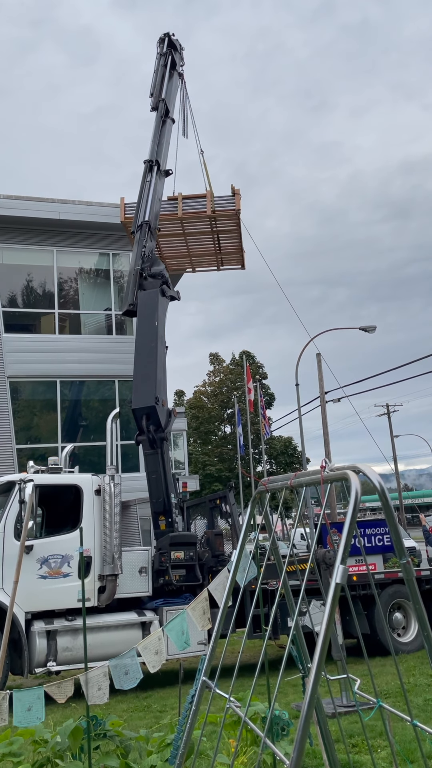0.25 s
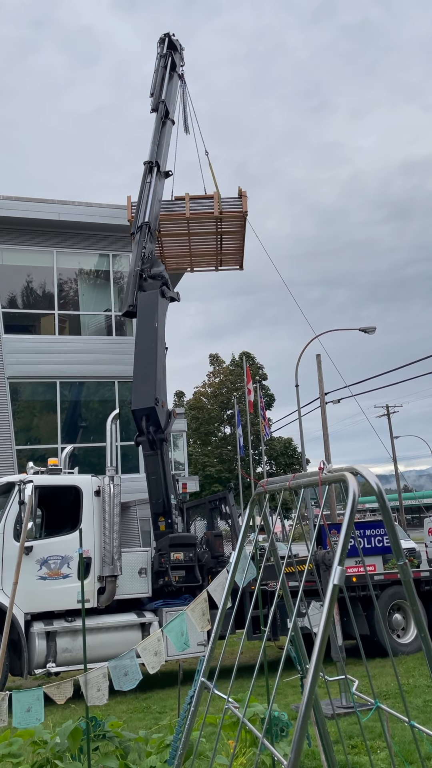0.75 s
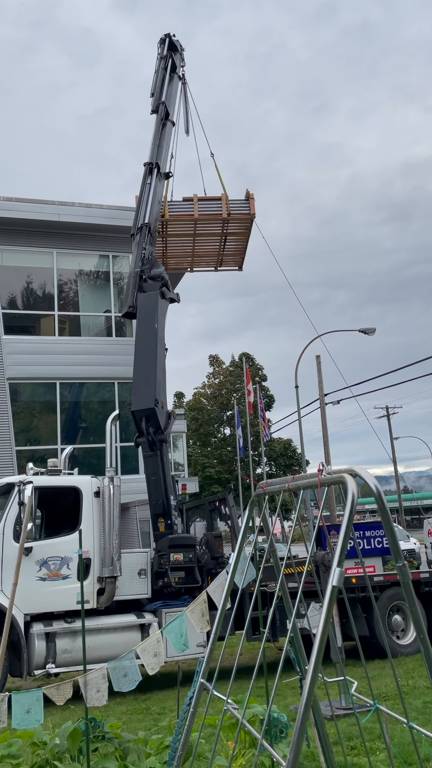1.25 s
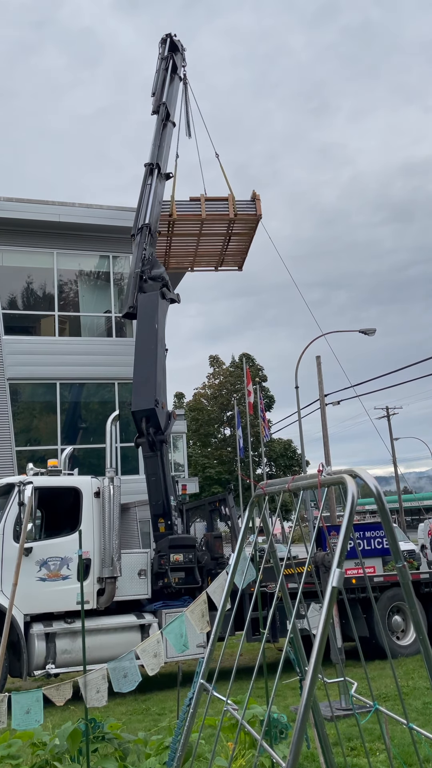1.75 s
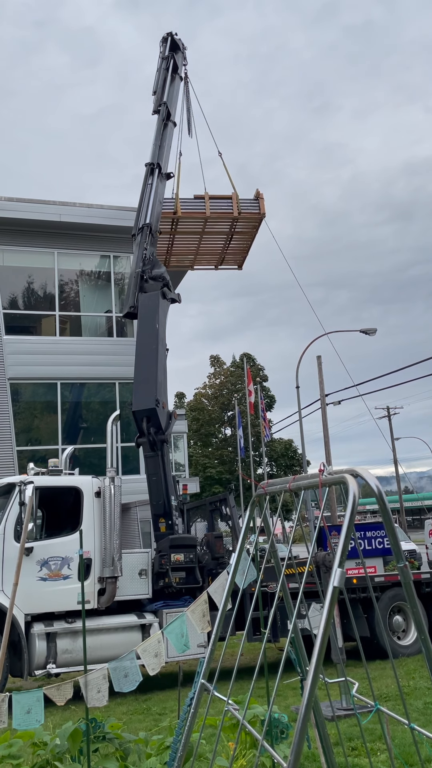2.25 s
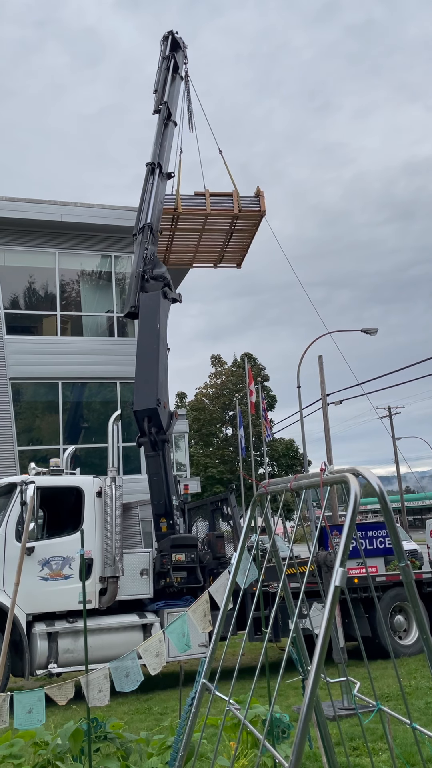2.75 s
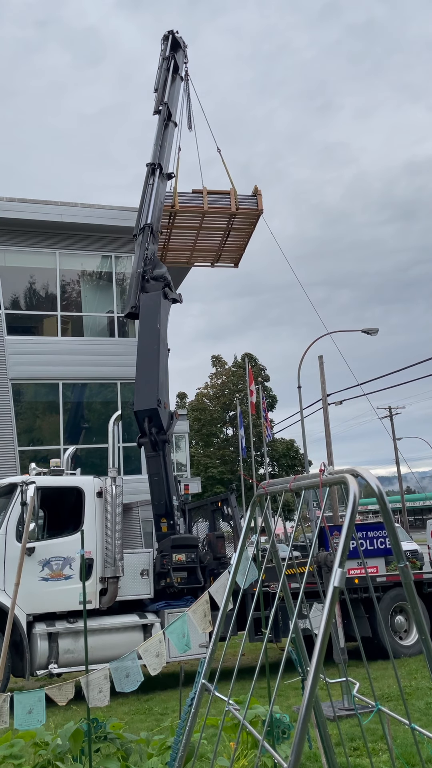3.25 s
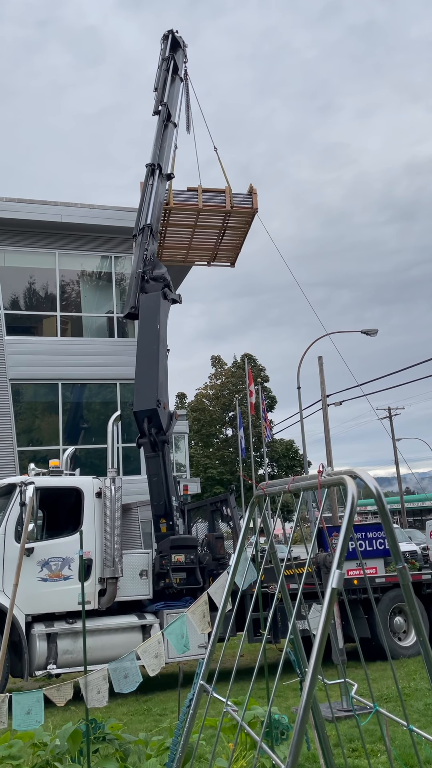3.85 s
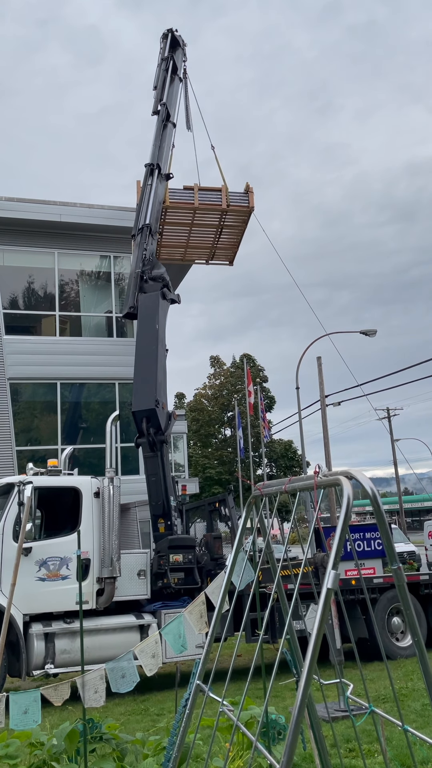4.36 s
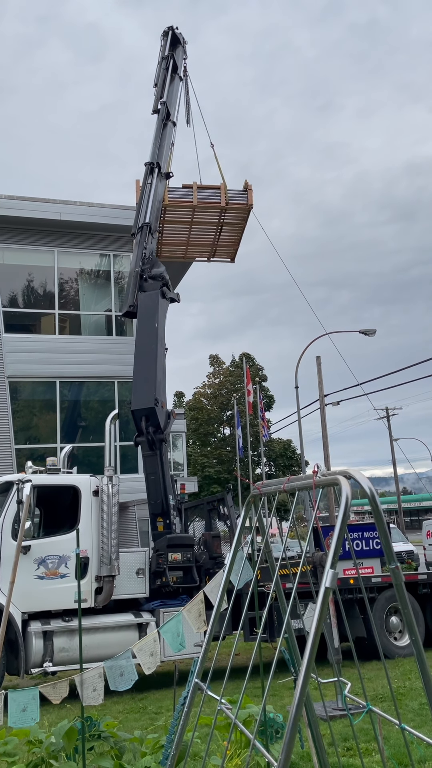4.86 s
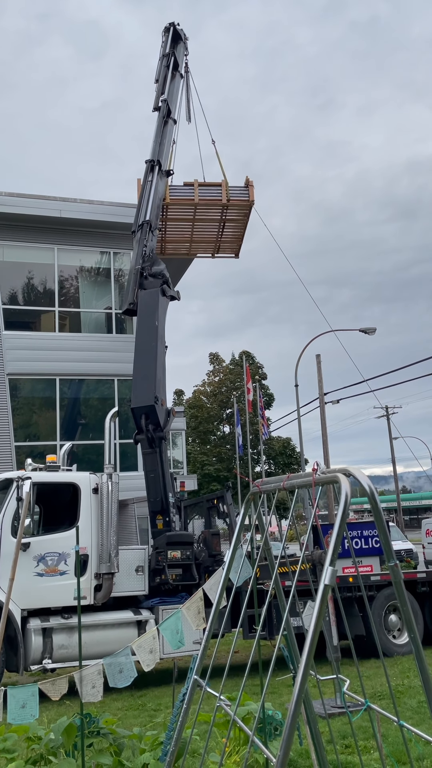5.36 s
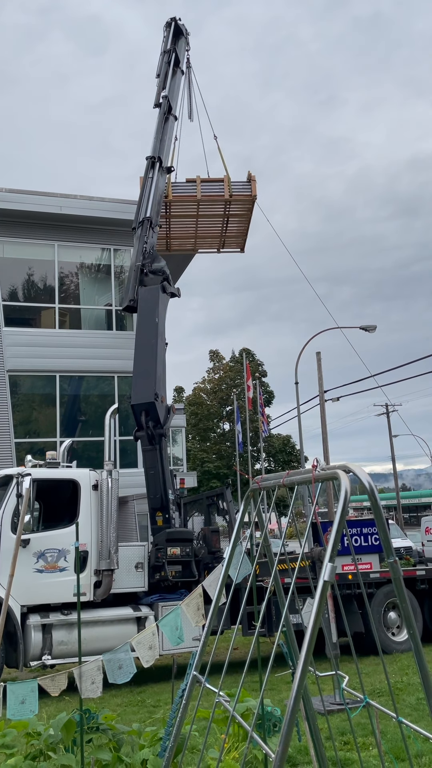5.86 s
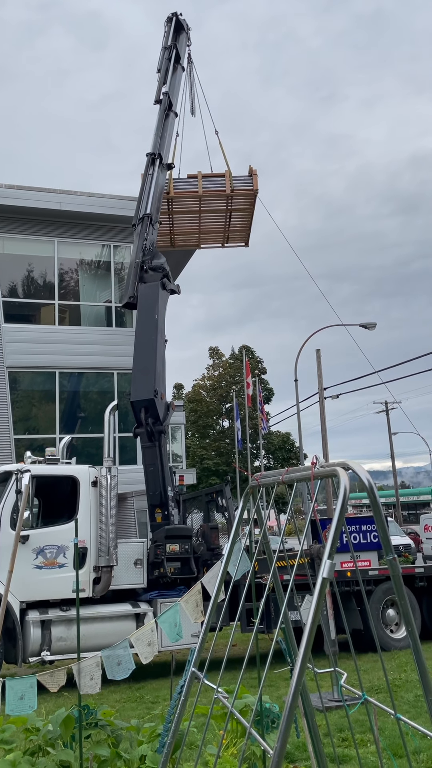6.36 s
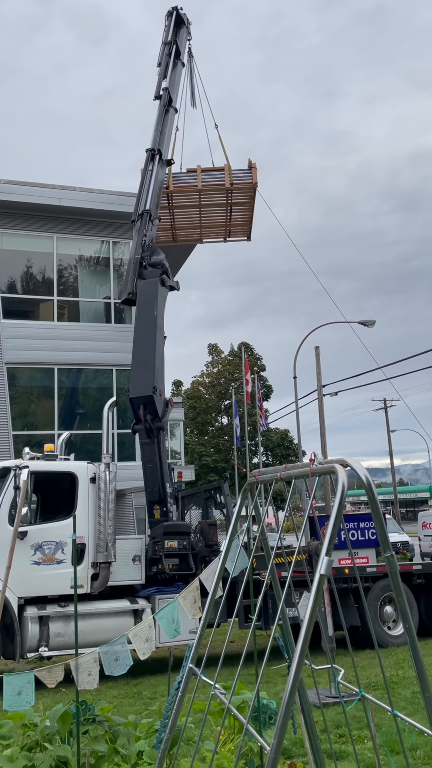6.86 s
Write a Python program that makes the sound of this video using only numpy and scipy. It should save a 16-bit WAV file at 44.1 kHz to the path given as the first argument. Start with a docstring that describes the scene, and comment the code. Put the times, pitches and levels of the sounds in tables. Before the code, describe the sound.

Outdoors, a truck-mounted crane runs with constant diesel rattle, steady gear and pump whine and oil hiss, as a passing vehicle draws near.

```python
"""A six-cylinder diesel at fast idle drones and clatters: a truck crane lifts a crate outdoors.
Engine, take-off gear and seven-piston pump are sums of sines locked to one shaft.
Clatter and valve hiss are coloured noise, a share of it repeating every engine cycle.
On the road behind, traffic draws near: noise swells by distance, and the exhaust note of one
vehicle beats against the diesel's firing note."""
import sys
import numpy as np
from scipy import signal
from scipy.fft import rfft, irfft
from scipy.io import wavfile

SR = 44100
rng = np.random.default_rng(int(sys.argv[2]) if len(sys.argv) > 2 else 0)


def dump(signal):
    """Clip the signal to [-1, 1] and save it as 16-bit WAV at the path in sys.argv[1]."""
    limited = np.clip(np.atleast_2d(signal).T, -1, 1)
    pcm = np.round(limited * 32767).astype(np.int16)
    wavfile.write(sys.argv[1], SR, pcm)


N = 313110
TIME = np.arange(N) / SR
FREQS = np.maximum(np.fft.rfftfreq(N, 1 / SR), 1)
WHINE_ORDER = 21  # pump whine per shaft turn: three times the piston rate
SHAFT_PER_CYCLE = 29.6484 / 10.4086  # shaft turns per four-stroke cycle


def from_db(db):
    """Decibels to gain."""
    return 10 ** (np.asarray(db) / 20)


def rms_one(x):
    """Scale to unit power."""
    return x / np.sqrt(np.mean(x ** 2) + 1e-20)


def in_time(rows):
    """Each column of a curve at every sample."""
    s, *columns = np.transpose(rows)
    return [np.interp(TIME, s, column) for column in columns]


def at_hz(rows, hz):
    """Each column of a table at the given frequencies, on a log axis."""
    f, *columns = np.transpose(rows)
    return [np.interp(np.log(hz), np.log(f), column) for column in columns]


def drift(rate_hz):
    """Slow chance with spread 1, changing about rate_hz times a second; drawn every 100 samples."""
    r = np.exp(-200 * np.pi * rate_hz / SR)
    white = rng.standard_normal(N // 100 + 1002)
    slow = signal.lfilter([1], [1, -2 * r, r * r], white)[1000:]  # settled part
    return np.interp(np.arange(N) / 100, np.arange(len(slow)), rms_one(slow))


def tone(turns, db):
    """A sine of the given rms level."""
    return np.sqrt(2) * from_db(db) * np.sin(2 * np.pi * turns)


def ports(hz):
    """Level difference/dB, coherence and left lead/rad; long waves reach both ports alike."""
    # two microphone ports: f/Hz, left-right/dB, coherence/0-1, left lead/rad
    port_rows = [(296, 4, 1, 0.46), (427, 2.5, 0.9, 1.02), (537, 8, 0.87, .5), (870, 3, 0.16, -0.07),
                 (1250, 3, 0.84, 0.5), (1690, -0.5, 0.82, 0.75), (1980, -2.5, 1, 0.5),
                 (2430, -10, 0.35, -1.5), (2570, -6.5, 0.6, -2.5), (3070, -1.5, 0.79, -2.5),
                 (3460, -7, 0.6, -4), (4350, -6, 0.32, -6), (5000, 2.5, 1, -6), (6030, 0, 1, -4.5),
                 (7760, 2, 1, -3), (10700, -1, 1, -0.5), (12600, 0, 1, 2)]
    mono_below_hz = 265
    pan_db, alike, lead = at_hz(port_rows, hz)
    apart = 1 / (1 + (mono_below_hz / hz) ** 4)
    coherence = 1 - (1 - np.clip(alike, 0, 1)) * apart ** 2
    return pan_db * apart, coherence, lead * apart


def noise(colour, cycle=None, repeat=0):
    """Unit-power stereo noise of given gain per frequency; a power share of its top may repeat per cycle."""
    white = rfft(rng.standard_normal((2, N)))
    if cycle is not None:
        repeat_above_hz = 750  # only the bright part, from metal contacts, repeats
        size = int(N / (cycle[-1] - cycle[0]))
        share = repeat / (1 + (repeat_above_hz / FREQS) ** 6)
        random_phase = np.exp(2j * np.pi * rng.random((2, size // 2 + 1)))
        one_cycle = rms_one(irfft(random_phase, size))
        contacts = one_cycle[:, (cycle * size).astype(int) % size]
        white = np.sqrt(1 - share) * white + np.sqrt(share) * rfft(contacts)
    pan_db, alike, lead = ports(FREQS)
    mid, side = white * np.sqrt([1 + alike, 1 - alike])
    left = (mid + side) * from_db(pan_db / 2)
    right = (mid - side) * from_db(-pan_db / 2) * np.exp(-1j * lead)
    return rms_one(irfft(np.array([left, right]) * colour, N))


def coloured(spectrum, cycle=None, repeat=0):
    """Stereo noise that follows a spectrum."""
    return noise(from_db(at_hz(spectrum, FREQS)[0]), cycle, repeat)


def whine(orders, shaft, swell_db, flutter_db, flutter_hz, jitter_turns):
    """Partials locked to a rotation; the higher ones flutter more in level and phase."""
    out = np.zeros((2, N))
    shaft_hz = shaft[-1] / TIME[-1]
    for order, (db, pan_db) in orders.items():
        lead = ports(order * shaft_hz)[2]
        loose = np.sqrt(order / WHINE_ORDER)
        turns = order * shaft + rng.random() + jitter_turns * loose * drift(6.8)
        phase = 2 * np.pi * (turns % 1)
        height = np.sqrt(2) * from_db(db + swell_db + flutter_db * loose * drift(flutter_hz))
        out[0] += from_db(pan_db / 2) * height * np.sin(phase)
        out[1] += from_db(-pan_db / 2) * height * np.sin(phase - lead)
    return out


def diesel(cycle, uneven_db, stroke_db):
    """Six firings a cycle, none quite alike; every third order lines up into a chug, the rest lie loose."""
    # exhaust partials: multiple of the cycle rate: mean level/dB
    engine_orders = {5: -50, 6: -30, 7: -50, 8: -50, 9: -35.6, 10: -44.5, 12: -29.9, 13: -52, 14: -42.4, 15:
                     -33, 16: -50, 17: -43.6, 18: -34.2, 22: -39.2, 23: -50, 24: -55.5, 26: -47.5, 27: -47,
                     28: -54, 30: -50, 31: -55, 34: -53, 35: -51, 36: -53, 38: -53}
    # the octave of the firing note throbs slowly
    throb_order, throb_db, throb_hz, throb_peak_s = 12, 1.1, 1.87, 0.27
    pipe_smear_turns = .08  # the pipe delays partials unequally: firings spread into the next
    chug_lag_cycles = .033  # the unequal cylinder groups chug a little after the firings
    effort_db = uneven_db * drift(2.3) + stroke_db * drift(22)
    throb = throb_db * np.cos(2 * np.pi * throb_hz * (TIME - throb_peak_s))
    out = 0
    for order, db in engine_orders.items():
        if order % 6 == 0:
            offset = 1 / 8  # firing harmonics in step
        elif order % 6 == 3:
            offset = chug_lag_cycles * (15 - order)
        else:
            offset = rng.random()
        wobble = .006 * drift(4)
        smear = pipe_smear_turns * (order / 6 - 2) ** 2
        level_db = db + effort_db + throb * (order == throb_order)
        out = out + tone(order * cycle + offset + wobble - smear, level_db)
    return out


def clatter(cycle, shaft, level_db, depth, knock_db):
    """Valves and injectors rattle partly alike each cycle over fan noise; firings knock unequally."""
    # f/Hz, relative density/dB
    clatter_colour = [(20, -41), (33, -39), (48, -4), (80, -5.5), (120, -2.5), (170, -6.5), (230, -5.5),
                      (310, -7.5), (370, -6), (470, -9.5), (680, -6.5), (1000, -10), (1450, -13),
                      (1750, -13), (2300, -17), (2600, -26.5), (3000, -38), (13000, -68)]
    piston_shake = .02  # depth at which the pump's piston strokes shake the clatter
    firings = 6 * cycle
    strength = from_db(knock_db * rng.standard_normal(int(firings[-1]) + 2))
    knock = np.interp(firings, np.arange(len(strength)), strength)
    shake = piston_shake * np.cos(2 * np.pi * 7 * shaft)
    alternate = depth * np.cos(np.pi * firings)  # strong and weak in turn
    rattle = from_db(level_db) * coloured(clatter_colour, cycle, repeat=.28)
    return rattle * knock * (1 + alternate + shake)


def buzz(cycle, level_db):
    """The engine's block and covers buzz on its higher orders."""
    # multiple of the cycle rate: level/dB before level_db
    buzz_orders = {42: -55, 46: -53, 48: -54, 51: -53, 53: -52, 54: -53, 56: -53, 58: -49, 60: -51, 64: -55,
                   65: -55, 69: -52, 71: -52, 72: -51, 75: -54, 84: -53, 88: -54, 89: -55, 90: -52, 93: -52,
                   94: -54, 99: -56, 102: -56, 109: -56, 112: -57, 114: -56, 119: -57, 126: -53, 133: -57,
                   135: -56, 145: -54, 173: -57, 216: -61}
    cycle_hz = (cycle[-1] - cycle[0]) / TIME[-1]
    orders = {order: (db, ports(order * cycle_hz)[0]) for order, db in buzz_orders.items()}
    return whine(orders, cycle, level_db, flutter_db=0.74, flutter_hz=2.4, jitter_turns=0.013)


def hum(cycle):
    """An engine partial and a slightly slower tone, probably the slipping fan, throb together."""
    # t/s, beat rate/Hz
    fan_slip = [(0, 2.05), (1.4, 2.7), (3.9, 2.4), (4.3, 1.2), (7.1, 1.65)]
    order, engine_db, fan_db = 32, -42, -41.3
    slip = np.cumsum(in_time(fan_slip)[0]) / SR
    return tone(order * cycle, engine_db) - tone(order * cycle - slip, fan_db)


def piston_pump(shaft):
    """Seven piston strokes a shaft turn whine, with harmonics and sidebands."""
    # multiple of the shaft rate: (level/dB, left-right/dB)
    piston_orders = {7: (-45.5, 0), 14: (-43.5, -1.1), 19: (-46, 11), 21: (-29.6, 6.7), 23: (-53, 6),
                     28: (-46, 2), 33: (-54, 9.5), 35: (-55, 6), 40: (-49.5, 10), 42: (-44.6, 8.9),
                     46: (-50.5, 3), 47: (-48, 2), 49: (-53.5, 3), 50: (-51, 2), 56: (-57.5, 0),
                     60: (-54, 0), 66: (-52.5, -3), 70: (-58, -5), 73: (-56, -5), 80: (-56, -7),
                     98: (-49, -5), 105: (-53, -5.5)}
    return whine(piston_orders, shaft, 0, flutter_db=0.0, flutter_hz=2.7, jitter_turns=0.0066)


def gear_load():
    """Load shifts ease in and out; gives dB changes of mesh tone, octave and octave sideband."""
    # middle t/s, half length/s, change/dB of mesh tone, of its octave, of the octave's sideband
    load_shifts = [(0.25, 0.49, 1.5, -6, 3), (1.3, 0.97, 1.5, 5, 5), (2.95, 0.3, -2.5, -6, -3),
                   (3.55, 0.15, 2, 0, -2), (4.3, 0.1, -5, -2.5, 0), (4.39, 0.18, 0, 11, 0),
                   (4.5, 1, 1, 2, -1)]
    changes = 0
    for middle_s, length_s, *changes_db in load_shifts:
        changes = changes + np.outer(changes_db, np.exp(-((TIME - middle_s) / length_s) ** 2))
    return changes


def take_off_gear(shaft):
    """The 26 teeth mesh once each per shaft turn; mesh tone and octave vary with the load."""
    # all five: multiple of the shaft rate: (level/dB before load and flutter, left-right/dB)
    mesh_orders = {25: (-45, 4.7), 26: (-35.3, 4.4), 27: (-45, 4.4)}
    octave_order = {52: (-48, 0)}
    upper_sideband = {53: (-53.5, 4)}
    outer_sidebands = {51: (-45, 0), 54: (-61, -2)}  # further lines around the octave
    top_orders = {78: (-52.5, -2), 91: (-56.5, -8.5), 104: (-53.5, -7), 130: (-54.8, -2.2), 131: (-61, -9),
                  156: (-60, -7), 182: (-62.5, 1)}
    mesh_db, octave_db, sideband_db = gear_load()
    mesh = whine(mesh_orders, shaft, mesh_db, flutter_db=.9, flutter_hz=4.9, jitter_turns=.035)
    octave = whine(octave_order, shaft, octave_db, flutter_db=1.8, flutter_hz=3.5, jitter_turns=0.016)
    sideband = whine(upper_sideband, shaft, sideband_db, flutter_db=2.5, flutter_hz=4.4, jitter_turns=0.06)
    outer = whine(outer_sidebands, shaft, 0, flutter_db=0.4, flutter_hz=5.9, jitter_turns=0.083)
    sheen = whine(top_orders, shaft, 0, flutter_db=1.0, flutter_hz=3.5, jitter_turns=0.06)
    return mesh + octave + sideband + outer + sheen


def oil(shaft, cycle, hiss_db, ripple, surge_db):
    """Oil surges through the valves and rings their block; flow ripples 2 and 6 times a shaft turn."""
    # f/Hz, relative density/dB
    hiss_colour = [(1200, -34), (2400, -2), (3100, 3), (4200, -4), (5600, -3.5), (6300, -5.5), (6800, -3.5),
                   (7300, -27.5), (9300, -10), (10800, -15.5), (12000, -22.5), (12900, -12)]
    # narrow rings of the valve block: f/Hz, width/Hz, level/dB
    valve_rings = [(1397, 140, -43), (3063, 81, -51), (3940, 64, -63.5), (4617, 66, -57), (5466, 95, -57),
                   (10930, 120, -65.5)]
    # the hiss ticks once per engine cycle
    tick_depth, tick_turns, tick_sharpness = .11, .1, 5
    ring_density, ring_power = 0, 0
    for hz, width_hz, db in valve_rings:
        power = from_db(db) ** 2
        ring_density = ring_density + power / width_hz / (1 + (2 * (FREQS - hz) / width_hz) ** 2) ** 2
        ring_power += power
    hiss = from_db(hiss_db + surge_db * drift(22)) * coloured(hiss_colour, cycle, repeat=.09)
    ringing = np.sqrt(ring_power) * noise(np.sqrt(ring_density))
    pulse = np.sin(2 * np.pi * 2 * shaft) + .6 * np.sin(2 * np.pi * 6 * shaft)
    tick = tick_depth * np.exp(tick_sharpness * (np.cos(2 * np.pi * (cycle - tick_turns)) - 1))
    return (hiss + ringing) * (1 + ripple * pulse + tick)


def passing(nearest_s, near_db, span_s, loss_db):
    """Gain of a source that moves past on a straight road."""
    distance = np.hypot(1, (TIME - nearest_s) / span_s)
    return from_db(near_db - loss_db * np.log10(distance))


def approaching_exhaust():
    """Three partials of a vehicle that speeds up, changes gear near 5 s and pulls, turning throaty."""
    # t/s, exhaust note f/Hz
    exhaust_pitch = [(0, 66.42), (1.2, 64.75), (2.2, 65.74), (3.3, 66.52), (4.4, 67.4), (5.0, 63.89),
                     (5.6, 67.86), (6.3, 68.38), (7.1, 68.97)]
    # dropping off the throttle: t/s, note level/dB, level/dB of the throaty partial a fourth above
    exhaust_level = [(0, -51, -48), (2.2, -39, -46), (3.3, -33, -42), (4.4, -42, -43), (5.0, -34, -44),
                     (5.6, -43, -44), (6.25, -37, -30.5), (6.6, -30, -36), (7.1, -21.5, -31)]
    sub_db = -13  # lowest partial relative to the throaty one an octave above
    note_db, throat_db = in_time(exhaust_level)
    crank = np.cumsum(in_time(exhaust_pitch)[0] / 3) / SR  # the note is its third order
    partials = {2: throat_db + sub_db, 3: note_db, 4: throat_db}
    out = 0
    for order, db in partials.items():
        out = out + tone(order * crank + 0.026 * drift(7), db + 0.94 * drift(2.7))
    return out


def road():
    """Tyre roar and rumble swell toward their nearest point, under the wavering exhaust note."""
    # both colours: f/Hz, relative density/dB
    rumble_colour = [(25, -24), (44, -4), (56, -17), (72, -4), (86, 13), (105, -7.5), (200, -2), (400, -38),
                     (2000, -90)]
    tyre_colour = [(30, -46), (250, -5), (600, -1.5), (900, 5.5), (1200, -2.5), (2000, -9), (4000, -20.5),
                   (12000, -48)]
    # both: nearest point t/s, level there/dB, time to travel that distance/s,
    # loss per tenfold distance, shielding included/dB
    rumble_pass = dict(nearest_s=6.2, near_db=-31.5, span_s=1.9, loss_db=31)
    tyre_pass = dict(nearest_s=5.85, near_db=-31, span_s=4.1, loss_db=98)
    rumble = passing(**rumble_pass) * coloured(rumble_colour)
    tyres = passing(**tyre_pass) * coloured(tyre_colour)
    return approaching_exhaust() + rumble + tyres


def scene():
    """One speed drives the engine, the gear and the pump."""
    # t/s, pump whine f/Hz
    pump_pitch = [(0, 623.2), (1.5, 624), (2.4, 622.2), (3.25, 623.3), (3.8, 622.7), (4.3, 621.2),
                  (4.85, 622.6), (5.7, 622.3), (7.1, 622.8)]
    shaft = np.cumsum(in_time(pump_pitch)[0] / WHINE_ORDER) / SR  # turns
    cycle = shaft / SHAFT_PER_CYCLE - 1 / 6  # four-stroke cycles
    engine = diesel(cycle, uneven_db=.3, stroke_db=.5) + hum(cycle)
    block = clatter(cycle, shaft, level_db=-28.0, depth=0.04, knock_db=1.1) + buzz(cycle, level_db=0.5)
    drive = piston_pump(shaft) + take_off_gear(shaft)
    hiss = oil(shaft, cycle, hiss_db=-39.0, ripple=0.071, surge_db=0.3)
    return engine + block + drive + hiss + road()


def record(dry):
    """The ends are eased over 2 ms and the top is cut steeply."""
    cutoff_hz = 12742
    ease = np.minimum(1, np.minimum(TIME, TIME[-1] - TIME) / .002)
    low_pass = signal.ellip(10, .1, 80, cutoff_hz, fs=SR, output="sos")
    return signal.sosfilt(low_pass, dry * ease)


dry = scene()
out = record(dry)
dump(out)
```